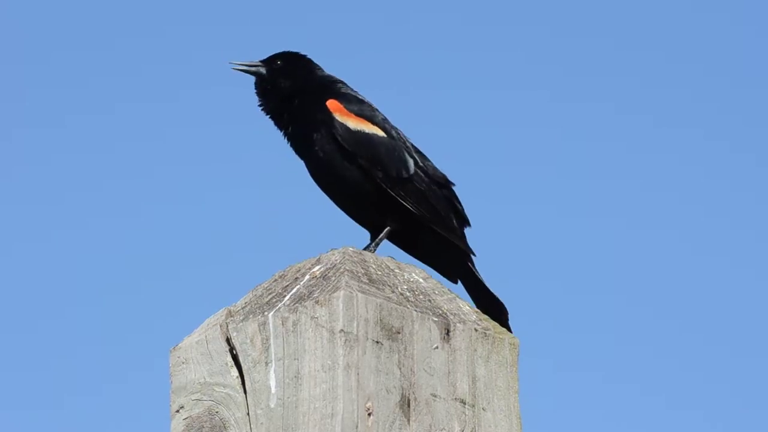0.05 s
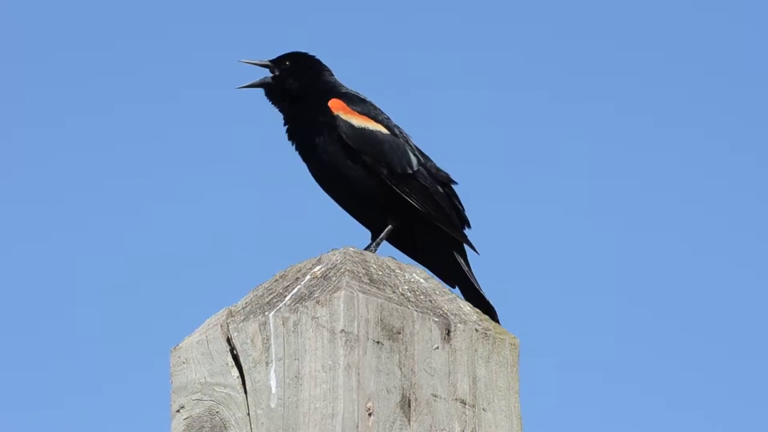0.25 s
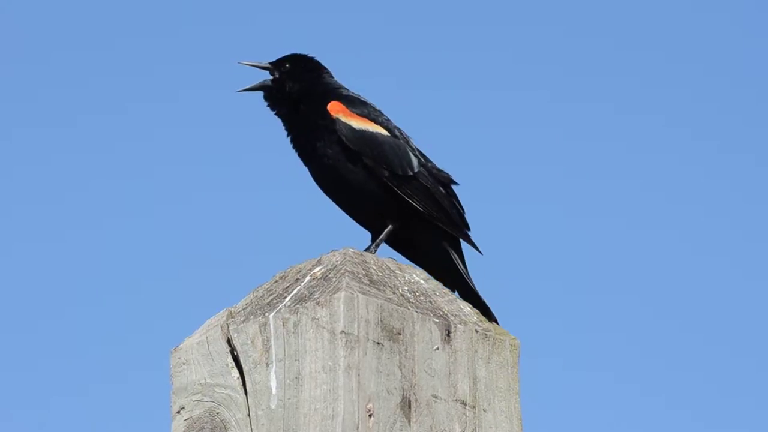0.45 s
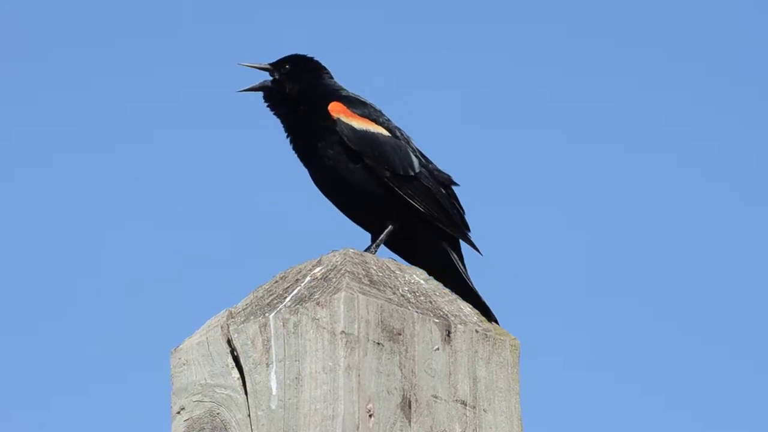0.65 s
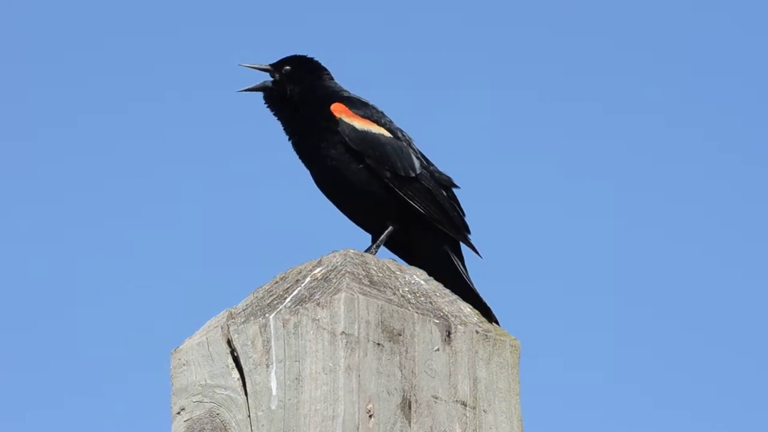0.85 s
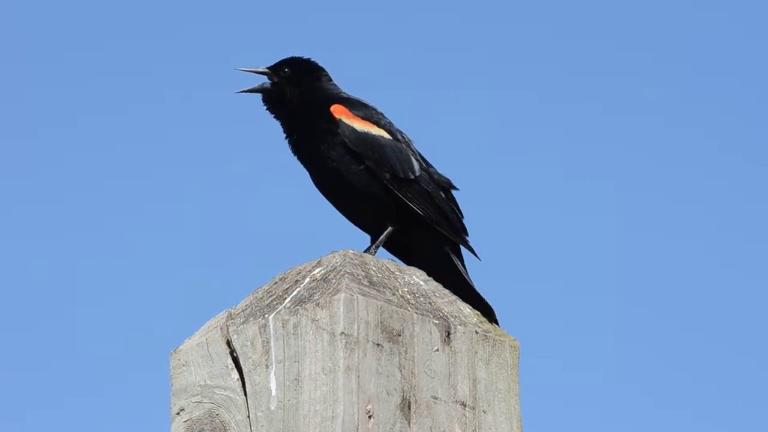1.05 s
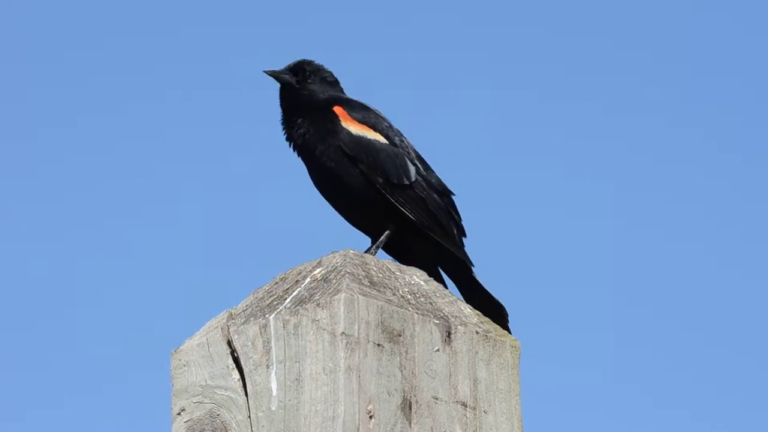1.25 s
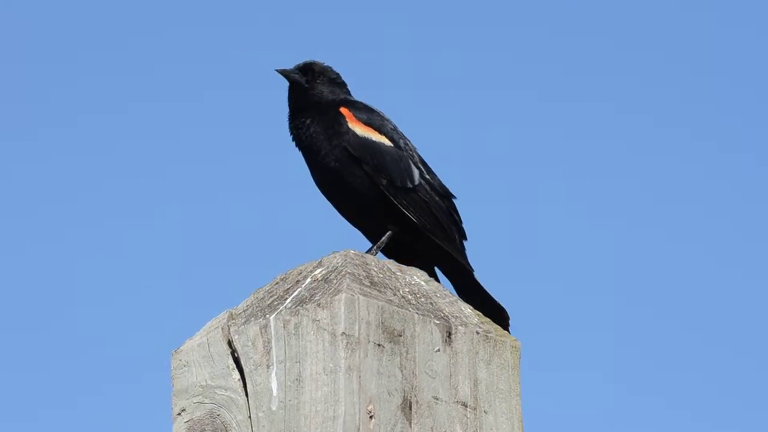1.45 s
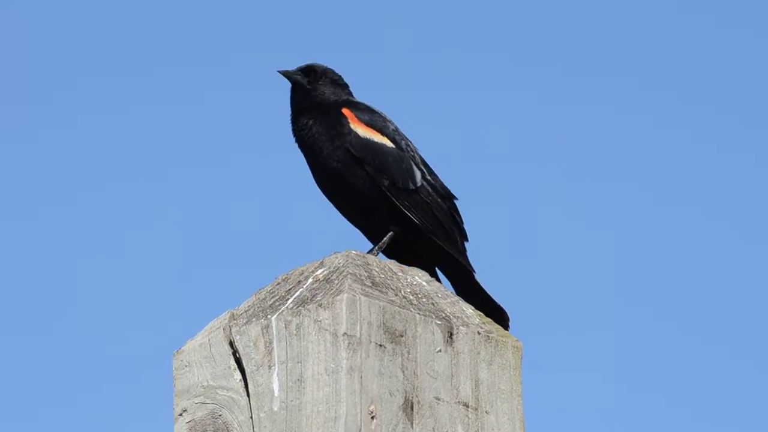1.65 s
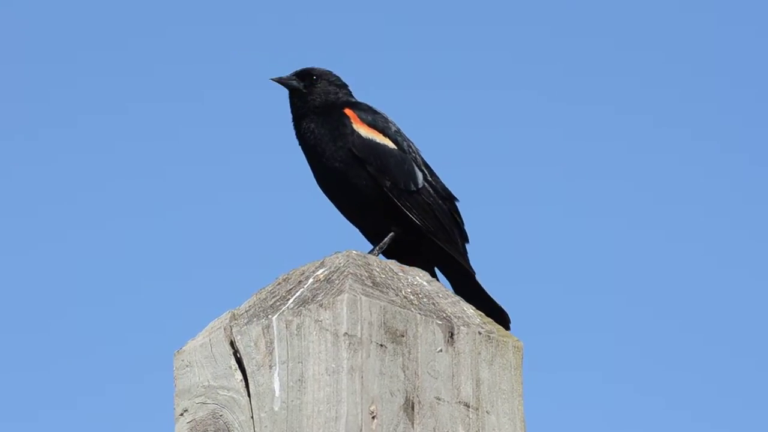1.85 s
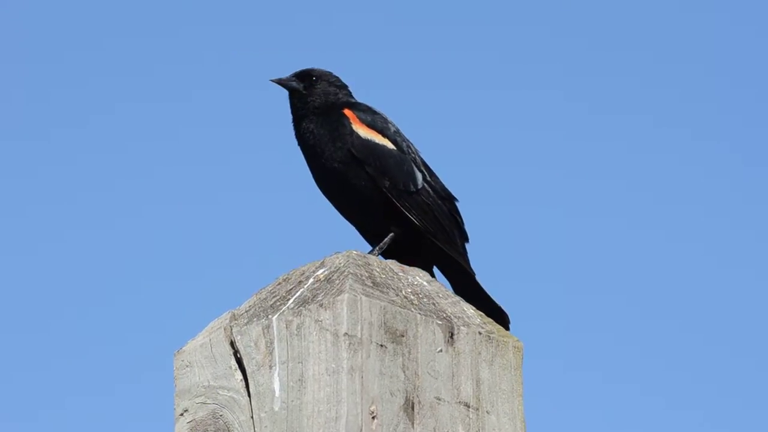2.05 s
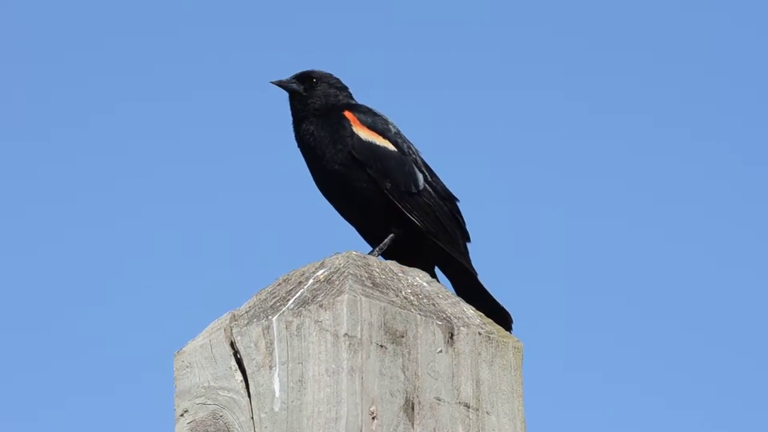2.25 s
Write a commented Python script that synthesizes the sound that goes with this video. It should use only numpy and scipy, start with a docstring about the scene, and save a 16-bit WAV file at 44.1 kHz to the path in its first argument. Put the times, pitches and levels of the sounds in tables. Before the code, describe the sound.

Close to the microphone, a blackbird gives a few short creaky, gurgling notes, a clear whistle and a loud rasping trill. Faint far birds follow, with a soft low wash like breeze and distant traffic throughout.

```python
"""A red-winged blackbird sings once from a wooden post, close by in open country.
Its syrinx opens with a thin note, a pulsed creak and a few gurgles that climb to a loud whistle.
A rasp leads into a buzzy trill of six syllables, each a double pip, a swelling two-voiced tone
and a rasp. Then far birds answer faintly. A low outdoor wash runs throughout."""
import sys
import numpy as np
from scipy import signal
from scipy.fft import rfft, irfft
from scipy.io import wavfile
from scipy.ndimage import uniform_filter1d

SR = 44100
rng = np.random.default_rng(int(sys.argv[2]) if len(sys.argv) > 2 else 0)


def to_wav(s):
    """Save 16-bit WAV."""
    ch = np.atleast_2d(s).T  # columns
    pcm = np.round(np.clip(ch, -1, 1) * 32767)  # PCM
    wavfile.write(sys.argv[1], SR, pcm.astype(np.int16))


N = 101429


def thin_note(out):
    """Two quiet voices of the syrinx open the song."""
    # Each row: time in seconds, pitch in Hz, level in dB.
    main_curve = [(0, 1520, -27.5), (.009, 1477, -36), (.021, 1524, -27.5), (.036, 1538, -39),
                  (.06, 1522, -38.5), (.092, 1527, -32.5), (.12, 1535, -34.5), (.16, 1530, -42.5),
                  (.19, 1464, -58.5)]
    second_curve = [(0, 2420, -55), (.06, 2320, -52.5), (.108, 2360, -42), (.116, 2480, -38.5),
                    (.126, 2470, -56)]
    # Harmonics 2-4 in dB re the fundamental.
    overtones_db = [-27.5, -50, -35.5]
    t, hz, db = follow(main_curve)
    add(out, t[0], eased(amp(db) * voice(hz, [0] + overtones_db, rough=.1)))
    t, hz, db = follow(second_curve)
    add(out, t[0], eased(amp(db) * voice(hz, [0], rough=.51)))


def creak(out):
    """Nearly regular pulses ring the throat."""
    # Each row: time in seconds, level in dB.
    shape = [(.108, -47.5), (0.117, -38), (0.121, -21), (.141, -27.5), (.148, -28), (.156, -29),
             (.17, -31.5), (.186, -34)]
    # Each row: frequency in Hz, gain in dB.
    resonances = [(600, -47), (1250, -10.5), (1580, 2), (1880, 1.5), (2200, -6.5), (2850, -32), (3130, -14),
                  (3400, -37.5), (5400, -60), (6250, -28), (7600, -66.5)]
    add(out, shape[0][0], buzz(shape, resonances, air=.41, rate_hz=316, jitter=.042))


def gurgles(out):
    """Short gliding notes and pips under airy overtones that also swell with the creak."""
    # Each row: start and length in seconds, first and last pitch in Hz, harmonics 1-3 in dB, roughness.
    notes = [(0.183, .028, 1120, 1188, -22.5, -46.5, -65, 0.2),
             (0.199, .042, 1225, 1234, -33, -27, -57, 0.5),
             (0.258, 0.026, 1709, 1697, -34, -36.5, -41.5, 0.08),
             (0.274, .014, 2502, 2447, -44.5, -35, -69.5, 0.2),
             (0.248, 0.015, 3500, 3310, -21, -61.5, -69.5, 0.3),
             (0.259, 0.023, 3564, 3508, -24.5, -60.5, -71, 0.5),
             (0.267, 0.026, 3407, 3467, -34.5, -68.5, -81, 0.3)]
    # Each row: time in seconds, level in dB.
    air_shape = [(0, -72.5), (.07, -72.5), (.105, -65), (.135, -60.5), (.17, -68.5), (.195, -80.5),
                 (.223, -55.5), (.238, -62.5), (.256, -59.5), (.275, -64.5), (.305, -80)]
    # Each row: frequency in Hz, gain in dB.
    air_spectrum = [(4000, -19.5), (5500, -11), (6400, 5.5), (7300, -3), (9000, -15), (11200, -3.5),
                    (12600, -18.5), (14100, -2.5), (15500, -24.5)]
    # Each row: centre and half width in seconds, pitch in Hz, level in dB.
    double_pip = [(.2208, .0008, 2430, -15.5), (.2238, .0009, 2480, -11.5)]
    single_pips = [(0.2367, .002, 2412, -21.5), (0.2457, .001, 2624, -26), (0.2485, 0.0012, 3740, -24.5),
                   (0.255, 0.0017, 2610, -27)]
    for start_s, length_s, first_hz, last_hz, *partials_db, rough in notes:
        u, envelope = swell(length_s)
        add(out, start_s, envelope * voice(first_hz + (last_hz - first_hz) * u, partials_db, rough))
    add(out, air_shape[0][0], buzz(air_shape, air_spectrum, air=.8))
    for row in double_pip + single_pips:
        pip(out, *row)


def whistle(out):
    """One loud, steady voice; its octave grows as it fades."""
    # Each row: time in seconds, pitch in Hz, fundamental in dB, octave in dB.
    curve = [(.278, 2506, -34, -54.5), (.29, 2500, -27.5, -43.5), (.301, 2516, -13, -47),
             (.312, 2472, -9.3, -48.5), (.323, 2482, -9, -60.5), (.336, 2485, -7, -42),
             (.344, 2492, -13.5, -35), (.35, 2500, -19.5, -32), (.356, 2533, -18.5, -38),
             (.377, 2513, -24.5, -29), (.39, 2530, -28.5, -36), (.406, 2540, -37.5, -57)]
    # Harmonics 4-6 in dB re the fundamental.
    overtones_db = [-61.5, -48, -59]
    t, hz, db, octave_db = follow(curve)
    partials_db = [db, octave_db, octave_db - 33] + [db + top for top in overtones_db]
    add(out, t[0], eased(voice(hz, partials_db, rough=.032)))


def lead_in(out):
    """A long rasp with a faint high fizz leads into the trill."""
    # Each row: time in seconds, level in dB.
    shape = [(.38, -50), (.396, -36), (0.401, -22), (.407, -32.5), (0.411, -22.5), (0.439, -19.5),
             (.455, -21.5), (0.478, -28), (.52, -37)]
    fizz_hz_db = [(8500, -30.5), (10200, 1), (12500, -30)]
    add(out, shape[0][0], rasp(shape))
    add(out, shape[0][0], amp(-44.5) * buzz(shape, fizz_hz_db, air=1))


def trill(out, rasp_delay_s=.046):
    """Ten syllables a second: two pips, two voices, a closing pip, a slur and a rasp, with high fizz."""
    # Each row: start in seconds, pip and tone in dB, tone pitch in Hz, second voice, rasp and fizz in dB.
    syllables = [(0.479, -12, -16, 1593, -20, -19.5, -62), (0.578, -15, -14.5, 1573, -21, -19, -64),
                 (0.678, -14.5, -16.5, 1572, -18, -20, -63), (.776, -13.5, -18, 1592, -18.5, -20, -62.5),
                 (.875, -13.5, -18, 1576, -18.5, -20.5, -57.5), (0.9759, -13.5, -19.5, 1576, -20, -22, -59)]
    # Each row: delay and half width in seconds.
    pip_timing = [(.0012, .00095), (.0052, .0014), (.0478, .0015)]
    # Each row: pitch in Hz, level in dB re the syllable's pip level.
    pip_tones = [(2600, 0.89), (2630, -2.3), (2730, -2)]
    # Each row: seconds into the rasp (fizz: into the syllable), relative level in dB.
    rasp_shape = [(0, -8), (.014, -2.5), (.032, -3), (.05, -9.5), (.07, -14.5), (.096, -28.5)]
    fizz_shape = [(-.012, -18), (.003, -3.5), (.014, -14.5), (.038, -1), (.046, -1.5), (.056, -11.5),
                  (.088, -20.5)]
    # Each row: frequency in Hz, gain in dB.
    fizz_spectrum = [(6000, -19.5), (10200, -22.5), (11000, -5), (11500, -8), (12500, -0.5), (13100, -7),
                     (14100, 1.5), (15500, -16.5)]
    for start_s, pip_db, tone_db, tone_hz, second_db, rasp_db, fizz_db in syllables:
        for (delay_s, width_s), (hz, db) in zip(pip_timing, pip_tones):
            pip(out, start_s + delay_s, width_s, hz, pip_db + db)
        swelling_tone(out, start_s, tone_hz, tone_db)
        second_voice(out, start_s, tone_hz, second_db)
        add(out, start_s + rasp_delay_s, amp(rasp_db) * slur())
        add(out, start_s + rasp_delay_s, amp(rasp_db) * rasp(rasp_shape))
        fizz = buzz(fizz_shape, fizz_spectrum, air=.45, rate_hz=330)
        add(out, start_s + fizz_shape[0][0], amp(fizz_db) * fizz)


def swelling_tone(out, start_s, hz, level_db, sag_hz_per_s=465, dulling_db_per_s=228.5):
    """A voice strongest at its octave; it sinks and dulls as it swells."""
    # Each row: seconds into the syllable, relative level in dB.
    shape = [(.005, -24.5), (.013, -12.5), (.03, -4), (.043, -0.5), (.048, -11.5), (.057, -16.5)]
    # Harmonics 1-2, relative level in dB.
    low_partials_db = [-22, -1.1]
    t, db = follow(shape)
    high_partials_db = [onset_db - dulling_db_per_s * t for onset_db in (-8, -40, -53.5)]
    tone = voice(hz - sag_hz_per_s * t, low_partials_db + high_partials_db, rough=.09)
    add(out, start_s + t[0], eased(amp(level_db + db) * tone))


def second_voice(out, start_s, tone_hz, level_db, pitch_ratio=1.665, coupling_db=-27.5):
    """The other side of the syrinx sings below the tone's octave, modulated by the tone."""
    # Each row: seconds into the syllable, relative level in dB.
    shape = [(.007, -11.5), (.013, -8), (.019, -1), (.024, -11.5), (.03, -7), (.036, -5), (.042, 1),
             (.047, -7), (.06, -16), (.08, -13.5), (.1, -16)]
    t, db = follow(shape)
    coupling = 1 + 2 * amp(coupling_db) * np.sin(2 * np.pi * tone_hz * t)
    tone = voice(np.full(len(t), pitch_ratio * tone_hz), [0], rough=.21)
    add(out, start_s + t[0], eased(amp(level_db + db) * coupling * tone))


def slur(first_hz=3250, last_hz=3670):
    """The upward slide that opens a rasp."""
    u, envelope = swell(length_s=.01)
    return amp(-4.5) * envelope * voice(first_hz + (last_hz - first_hz) * u, [0], rough=.17)


def rasp(shape):
    """Harsh, uneven pulses in the song's main resonances."""
    # Each row: frequency in Hz, gain in dB.
    resonances = [(1000, -29), (1450, -18.5), (1650, -10.5), (1900, -30), (2350, -19), (2720, 0),
                  (2920, -5.5), (3150, -2.5), (3550, -2.5), (3900, -7.5), (4300, -16), (5000, -13.5),
                  (5400, -35), (6100, -44), (9000, -58.5), (10100, -53.5), (11500, -65), (15000, -66.5)]
    return buzz(shape, resonances, air=.45)


def pip(out, centre_s, width_s, hz, db):
    """A Gaussian tone burst of a few milliseconds."""
    # Harmonic 2 in dB re the fundamental.
    overtones_db = [-40.5]
    t = np.arange(-4 * width_s, 4 * width_s, 1 / SR)
    envelope = amp(db) * np.exp(-(t / width_s) ** 2 / 2)
    add(out, centre_s + t[0], envelope * voice(np.full(len(t), hz), [0] + overtones_db, rough=.073))


def voice(hz, partials_db, rough):
    """One side of the syrinx: harmonics on a pitch curve; rough (0-1) shakes pitch and strength."""
    phase = 2 * np.pi * np.cumsum(hz * (1 + .096 * rough * wobble(len(hz), rate_hz=440))) / SR
    flutter = (1 + rough * wobble(len(hz), rate_hz=370)) / np.sqrt(1 + rough ** 2)
    harmonics = sum(amp(db) * np.sin(k * phase) for k, db in enumerate(partials_db, 1))
    return np.sqrt(2) * flutter * harmonics


def buzz(shape, spectrum, air, rate_hz=480, jitter=.6, sweep_s_per_hz=8e-7):
    """Uneven syrinx pulses, each a tiny downward chirp, and air noise ring the throat and beak."""
    t, db = follow(shape)
    cycles = np.cumsum(rate_hz * np.exp(jitter * wobble(len(t), rate_hz=470))) / SR
    pulses = np.diff(np.floor(cycles), prepend=-1)
    hz = np.fft.rfftfreq(len(t), 1 / SR)
    chirps = irfft(rfft(pulses) * np.exp(1j * np.pi * sweep_s_per_hz * hz ** 2), len(t))
    breath = air * rng.standard_normal(N)[:len(t)]
    return eased(colour(evened(chirps) + breath, spectrum) * amp(db))


def echoes(x, t60_s):
    """Sparse reflections from the ground and plants."""
    t = np.arange(SR) / SR
    taps = rng.standard_normal(SR) * (rng.random(SR) < 2000 / SR)
    taps *= (t > .004) * amp(-60 * t / t60_s)
    return signal.fftconvolve(x, taps / np.linalg.norm(taps))[:N]


def far_birds():
    """Faint rising chips and falling whistles from other birds."""
    # Each row: start and length in seconds, first and last pitch in Hz, level in dB, roughness.
    calls = [(1.157, 0.024, 2200, 2460, -54, .12), (1.224, 0.042, 2610, 2510, -58, 0.3),
             (1.18, .215, 3780, 3440, -66, 0.03), (1.225, .145, 3840, 3750, -67, 0.03),
             (1.463, .03, 2200, 2440, -56.5, .15), (2.134, 0.027, 2490, 2550, -57, 0.37),
             (2.19, 0.081, 3350, 3298, -53, .13), (2.213, .065, 3080, 3010, -57.5, 0.5),
             (2.288, 0.025, 2950, 2800, -47, 0.46)]
    out = np.zeros(N)
    for start_s, length_s, first_hz, last_hz, db, rough in calls:
        u, envelope = swell(length_s)
        hz = last_hz + (first_hz - last_hz) * (1 - u) ** 2.4
        add(out, start_s, amp(db) * envelope * voice(hz, [0], rough))
    return out + amp(-5.5) * echoes(out, t60_s=.24)


def wash(level_db=-38.5, patch_db=.95):
    """Low outdoor noise, like far traffic and breeze, drifting in patches."""
    # Each row: frequency in Hz, relative density in dB.
    spectrum = [(15, -55.5), (25, -27), (57, -7), (109, -2), (166, -3.5), (277, -7.5), (354, -6.5),
                (400, -11.5), (633, -14), (800, -9.5), (1130, -8.5), (1650, -18.5), (2000, -24),
                (2460, -35), (2900, -36), (3500, -42.5), (4050, -35), (4500, -46.5), (5200, -47.5),
                (6500, -57), (9000, -60), (15500, -69.5)]
    hz = np.fft.rfftfreq(2048, 1 / SR)
    real, imag, patches = rng.standard_normal((3, N // 512 + 5, len(hz)))
    patches = evened(uniform_filter1d(uniform_filter1d(patches, size=10, axis=0), size=12, axis=1))
    frames = (real + 1j * imag) * amp(spectrum_db(spectrum, hz) + patch_db * patches)
    return amp(level_db) * evened(signal.istft(frames.T, nperseg=2048, noverlap=1536)[1][:N])


def amp(db):
    """Decibels to gain."""
    return 10 ** (np.asarray(db) / 20)


def evened(x):
    """Scales to rms 1."""
    return x / np.sqrt(np.mean(x ** 2) + 1e-20)


def spectrum_db(points, hz):
    """Interpolates a spectrum on a log-frequency axis."""
    point_hz, db = np.transpose(points)
    return np.interp(np.log(hz + 1), np.log(point_hz), db)


def follow(points):
    """Time axis and sampled columns of a curve."""
    times_s, *columns = np.transpose(points)
    t = np.arange(times_s[0], times_s[-1], 1 / SR)
    return [t] + [np.interp(t, times_s, column) for column in columns]


def add(mix, start_s, sound):
    """Mixes a sound in, in place."""
    part = mix[max(round(start_s * SR), 0):][:len(sound)]
    part += sound[:len(part)]


def colour(x, spectrum):
    """Minimum-phase filter; output at rms 1."""
    log_gain = np.log(amp(spectrum_db(spectrum, abs(np.fft.fftfreq(2048, 1 / SR)))))
    ring = np.fft.ifft(np.exp(np.conj(signal.hilbert(log_gain)))).real
    return evened(signal.fftconvolve(x, ring)[:len(x)])


def wobble(size, rate_hz):
    """Smooth random motion of rms about 1."""
    noise = rng.standard_normal(16384)
    hz = np.fft.rfftfreq(len(noise), 1 / SR)
    return evened(irfft(rfft(noise) * np.exp(-(hz / rate_hz) ** 2)))[:size]


def swell(length_s, edge_share=.3):
    """Progress 0-1 through a note, and its rise, hold and fall."""
    u = np.linspace(0, 1, round(length_s * SR))
    return u, np.sin(np.pi / 2 * np.minimum(np.minimum(u, 1 - u) / edge_share, 1)) ** 2


def eased(sound, fade_s=.006):
    """Soft start and stop."""
    t = np.arange(len(sound)) / SR
    return sound * np.sin(np.pi / 2 * np.minimum(np.minimum(t, t[::-1]) / fade_s, 1)) ** 2


def scene():
    """The near bird, its echoes, far birds and the wash, in mono."""
    song = np.zeros(N)
    for sing in (thin_note, creak, gurgles, whistle, lead_in, trill):
        sing(song)
    space = amp(-17) * echoes(song, t60_s=.21) + amp(-27) * echoes(song, t60_s=.65)
    return (song + space + far_birds() + wash())[None]


def record(dry):
    """Steep low-pass on the top treble."""
    cutoff_hz = 15830
    lowpass = signal.firwin(511, cutoff_hz, window=("kaiser", 9), fs=SR)
    return signal.oaconvolve(dry, lowpass[None], "same")


dry = scene()
out = record(dry)
to_wav(out)
```